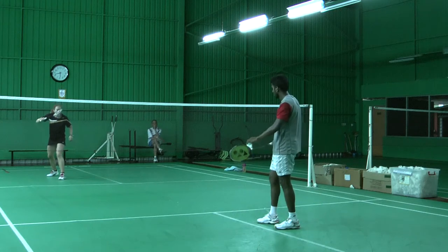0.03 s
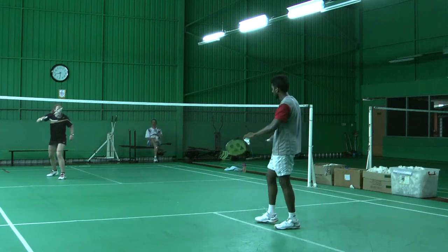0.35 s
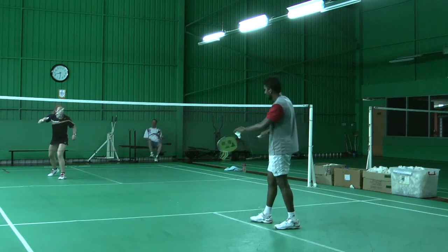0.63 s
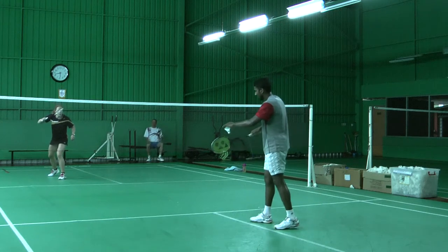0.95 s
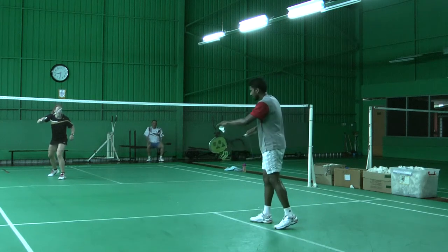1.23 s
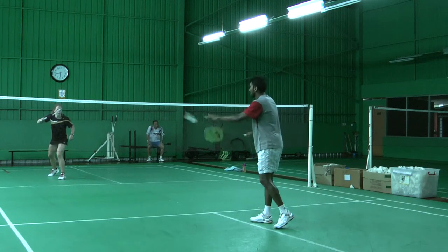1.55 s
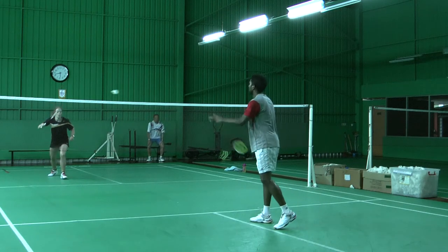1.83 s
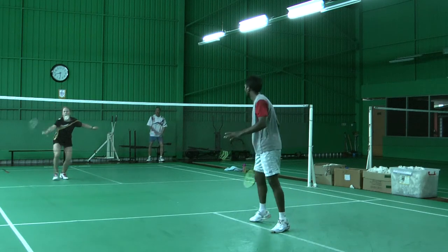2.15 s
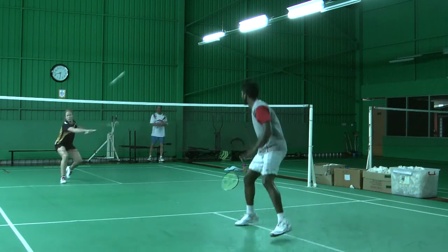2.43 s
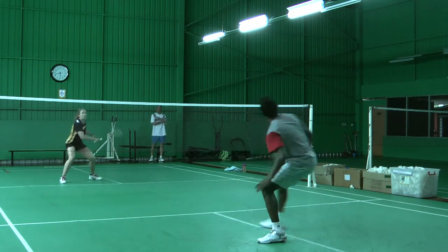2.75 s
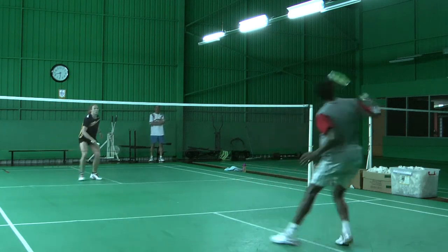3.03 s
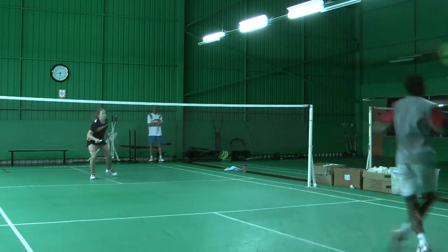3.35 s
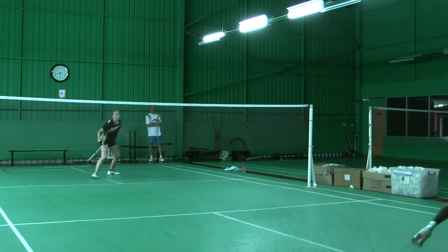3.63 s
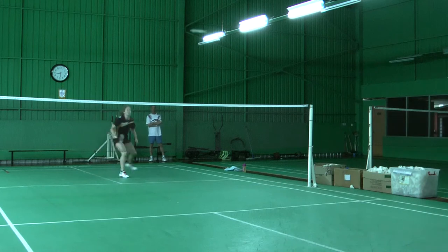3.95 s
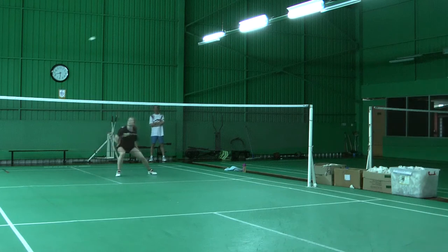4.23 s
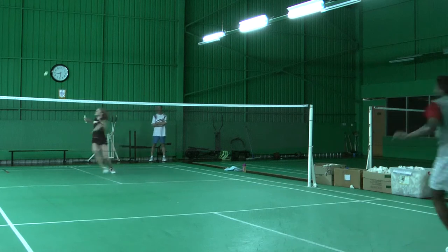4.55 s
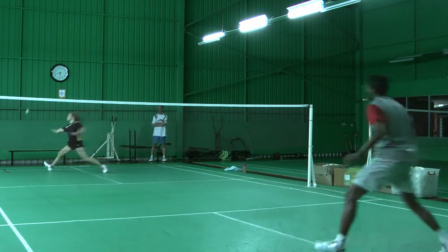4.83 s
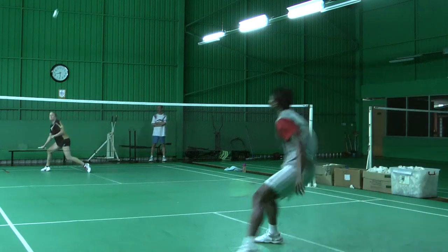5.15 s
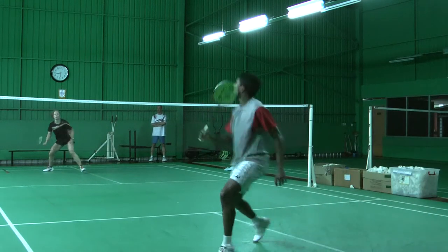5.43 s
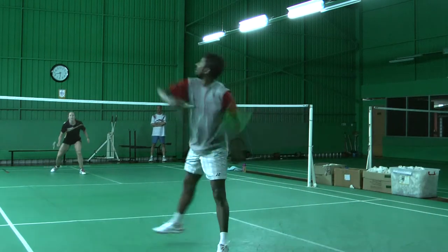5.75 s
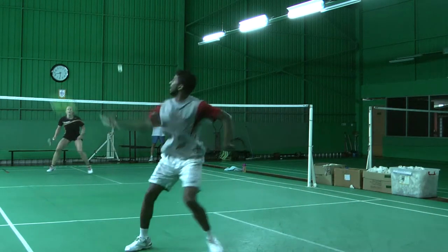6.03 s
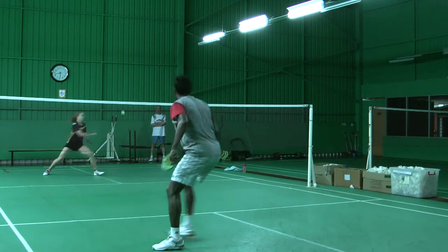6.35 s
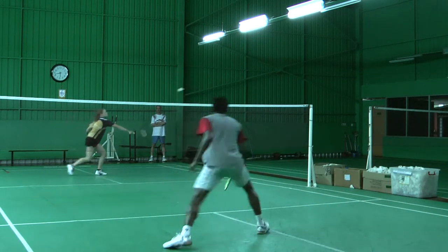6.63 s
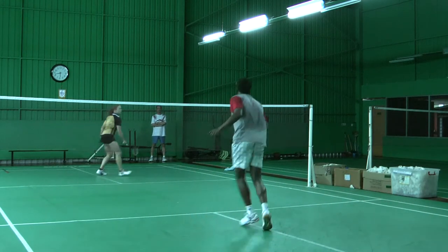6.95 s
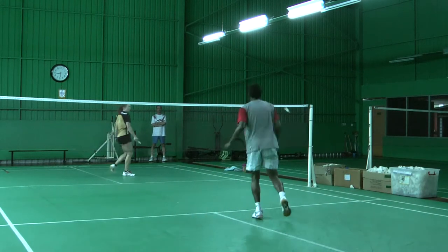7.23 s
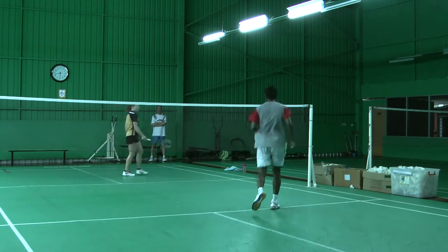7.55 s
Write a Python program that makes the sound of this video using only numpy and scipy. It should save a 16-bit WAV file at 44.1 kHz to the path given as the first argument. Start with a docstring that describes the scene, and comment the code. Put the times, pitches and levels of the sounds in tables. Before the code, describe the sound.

Over quiet ventilation and faint hums, a badminton game starts with soft taps, then builds into sharp racket cracks, short swishes, high shoe squeaks and slapping footfalls. Each sound leaves a long echo in the big indoor hall. Near the end come a weak hit, light steps and a rustle of clothing. Heard from beside the court, the sound is compressed so echoes stay strong, and it drops to silence five times for an instant.

```python
"""Badminton rackets strike a shuttle: each impact cracks and excites the membrane modes of the strings.
Swings whistle by vortex shedding; rubber soles squeak by stick-slip friction and thud on the court.
A large sheet-metal sports hall reverberates after each, over rustling clothes, low hums and air noise.
An automatic gain control holds the loud echoes level, and the sound cuts out five times."""
import sys
import numpy as np
from scipy import signal
from scipy.fft import rfft, irfft, next_fast_len
from scipy.io import wavfile
from scipy.ndimage import uniform_filter1d, minimum_filter1d

SR = 44100
rng = np.random.default_rng(int(sys.argv[2]) if len(sys.argv) > 2 else 0)


def inscribe(sig):
    """Save sig as 16-bit PCM at rate SR to the path in sys.argv[1].

    A 1-D sig is mono; a 2-D sig holds one channel per row.
    Samples are clipped to [-1, 1] before scaling.
    """
    pcm = np.round(np.clip(np.atleast_2d(sig).T, -1, 1) * 32767)
    wavfile.write(sys.argv[1], SR, pcm.astype(np.int16))


N = 343537
TIME = np.arange(N) / SR
CUTOFF_HZ = 16000

# Spectral envelope of the crack: f/Hz, level/dB
CRACK_SPECTRUM = [(100, -12), (250, -4), (480, 4), (800, -1), (1300, 4.5), (2100, 3.5), (3200, 3),
                  (4400, 2), (6500, 4.5), (8000, 1), (11000, 4), (16000, 0.5)]
# Racket impacts: t/s, level/dB, low-pass f/Hz, string f/Hz, ping re crack/dB, cork push/1, direct gain/dB
RACKET_HITS = [(0.5148, -10, 7200, 1203, -10.5, 1.1, -12.5), (1.509, -28.5, 4640, 1076, -1.5, .7, -6),
               (2.0926, 23.5, 5840, 1270, -17, 0.82, -2), (3.481, -7.5, 7000, 1390, -10, .7, -4.5),
               (3.7164, 18, 6300, 1181, -19, 0.36, -4.5), (4.971, 24.5, 6000, 1093, -12, 0.65, -18),
               (5.8738, 15.5, 6800, 1214, -18.5, 1.4, -8.5), (6.497, -22, 2500, 1357, 4.5, .7, -2)]


def strokes(crack_s=0.0042, contact_s=0.00037, string_t60=0.086, size=16384):
    """Impact excitation: the cork pushes, the feathers crack, and the string bed rings in damped modes."""
    bus, t = np.zeros((2, N)), TIME[:size]
    modes = [(1, 0), (1.58, -20), (2.15, -18), (2.7, -18.5)]  # frequency ratio, level/dB
    u = t / contact_s - 2
    for s, level_db, bright_hz, string_hz, ring_db, push, direct_db in RACKET_HITS:
        contact = push * 2 * u * np.exp(-u * u)  # derivative of a Gaussian pulse
        crack = rng.standard_normal(size) * np.exp(-t / crack_s)
        ping = sum(from_db(db) * np.sin(2 * np.pi * ratio * string_hz * t) for ratio, db in modes)
        ping *= from_db(ring_db - 60 * t / string_t60)
        hit = impact(crack + contact, CRACK_SPECTRUM, bright_hz, crack_s)
        direct, radiated = from_db(level_db) * (hit + ping)
        add(bus, s, from_db(direct_db) * direct, radiated)
    return bus


def impact(force, spectrum, bright_hz, length_s):
    """Source-filter model: an impact heard directly, and averaged over directions to a smooth spectrum."""
    impulse = np.eye(1, len(force))[0]
    pair = lowpass(colour(np.array([force, impulse]), spectrum), bright_hz)
    return pair * np.sqrt(length_s * SR / 2 / np.sum(pair ** 2, axis=1, keepdims=True))


# Racket swings: fastest moment t/s, half duration/s, f/Hz, level/dB
SWINGS = [(2.076, 0.0066, 485, -23), (3.655, 0.0027, 514, -8.5), (3.702, 0.0089, 669, -12.5),
          (4.227, 0.0039, 557.5, -15.5), (4.898, 0.0078, 567, -29), (4.929, 0.012, 491, -32),
          (7.483, 0.0065, 508.5, -33.5)]


def swishes(unsteady=0.086, hall_db=-3, size=4096):
    """Vortex shedding: the shaft gives a short, low Aeolian tone at the peak of the swing."""
    bus, t = np.zeros((2, N)), TIME[:size] - size / 2 / SR
    for s, half_length, hz, level_db in SWINGS:
        phase = 2 * np.pi * np.cumsum(hz * (1 + unsteady * wander(92, size))) / SR
        whistle = from_db(level_db) * np.sqrt(2) * np.sin(phase) * np.exp(-(t / half_length) ** 2)
        add(bus, s + t[0], whistle, from_db(hall_db) * whistle)
    return bus


# Sliding soles: t/s, duration/s, f/Hz, level/dB, overtone gain/dB, direct gain/dB
SLIDES = [(1.408, 0.043, 2894, -46, -28, -10), (2.671, 0.0087, 2290, -8.5, 5.5, 4),
          (2.711, 0.014, 2327, -7.5, -2, -2.5), (2.803, .007, 2816, -6.5, -14, -4),
          (3.051, 0.0061, 2870, -2.5, -9, -9.5), (3.063, 0.017, 2447, -5, -17, 2),
          (3.108, 0.022, 2238, -9.5, 2.5, -3.5), (3.631, 0.031, 2095, -9.5, 0, -9.5),
          (3.653, 0.055, 2070, -10, 2.5, -6.5), (4.226, 0.012, 2790, -7.5, -7, -1.5),
          (4.247, 0.063, 2925, -11, -4, -1), (5.13, .03, 2216, 8.5, 0, 0.5),
          (5.185, 0.0088, 2160, 12.5, 3, -4.5), (5.209, 0.015, 2483, -5, -12.5, 18),
          (5.252, 0.026, 2423, 11.5, -4, -5), (5.799, 0.028, 2788, -1.5, -10.5, -0.5),
          (5.833, 0.045, 2720, -3, -2, -4), (5.892, 0.0227, 2313, 2.5, -2.5, -4.5),
          (5.931, 0.071, 2850, -5, -7, -12), (5.956, 0.037, 2487, -0.5, -12, -23),
          (6.426, 0.022, 2320, -12, -7.5, -1.5), (6.485, 0.037, 2190, -19, -11.5, 10.5)]


def squeaks(sag=.04, jitter=.12, flutter=.24, scuff_hz=2100, rub_db=-9, edge_s=0.00064, size=8192):
    """Stick-slip oscillation: rubber grips and lets go thousands of times a second, giving harmonics."""
    bus, t = np.zeros((2, N)), TIME[:size]
    for s, length, hz, level_db, overtone_db, direct_db in SLIDES:
        # long, low scuffs are rougher than tight, high ones: they waver and hiss more
        roughness = .135 + 11 * length * (scuff_hz / hz) ** 4.6
        glide = 1 + sag * (.5 - np.minimum(t / length, 1))  # the pitch falls as the foot slows
        pitch = hz * glide * (1 + jitter * roughness * wander(450, size))
        phase = 2 * np.pi * np.cumsum(pitch) / SR
        overtones = from_db(overtone_db + np.array([0, -5, -9]))
        tone = np.sin(phase) + sum(gain * np.sin(k * phase) for k, gain in enumerate(overtones, 2))
        tone = unit_rms(lowpass(tone, hz=8300, order=4))
        rub = unit_rms(lowpass(rng.standard_normal(size), hz=7700))
        gate = np.clip(np.minimum(t, length - t) / edge_s, 0, 1)
        grip = np.exp(flutter * wander(130, size))
        sound = gate * grip * (tone + roughness * from_db(rub_db) * rub)
        sound *= from_db(level_db) * np.sqrt(length * SR / np.sum(sound ** 2))
        add(bus, s, from_db(direct_db) * sound, all_round(sound, width_hz=110))
    return bus


def all_round(sound, width_hz):
    """Spatial averaging: summed over all directions, the fine ripples of a spectrum even out."""
    spectrum = rfft(sound)
    bins = max(int(width_hz * len(sound) / SR), 1)
    power = np.abs(uniform_filter1d(np.abs(spectrum) ** 2, bins))
    return irfft(np.sqrt(power) * np.exp(1j * np.angle(spectrum)))


# Spectral envelope of a sole's slap, ahead of its low-pass: f/Hz, level/dB
SOLE_SPECTRUM = [(40, -28), (100, -6.5), (200, -1), (420, 3.5), (700, 1.5), (1100, 4.5), (2000, 13),
                 (4000, 12), (16000, 23)]
# Footfalls: t/s, level/dB, low-pass f/Hz, direct gain/dB
FOOTFALLS = [(2.396, 0, 620, 0), (2.554, -18, 1200, 3), (2.839, -2, 700, -1.5), (3.076, -2, 520, -4),
             (3.246, -19, 915, 6), (3.634, -2.5, 1400, -14), (3.795, 9, 1200, -5), (4.705, -33.5, 900, 6),
             (4.945, 15, 1100, -1), (4.98, 7.5, 350, -10.5), (5.056, 2.5, 1220, -3),
             (5.948, 4.5, 1307, -7.5), (6.489, -15, 1270, 0), (6.61, -22, 917, 4.5), (6.693, -35, 1144, 16),
             (7.093, -34, 1200, -2), (7.459, -31.5, 920, -10), (7.7233, -24.5, 1210, -3.5)]


def steps(slap_s=0.011, forefoot_s=.031, forefoot_db=-6, forefoot_dulling=0.79, size=4096):
    """Impact noise: the heel, then the softer, duller forefoot, slaps the mat in a cluster of contacts."""
    bus, t = np.zeros((2, N)), TIME[:size]
    for s, level_db, bright_hz, direct_db in FOOTFALLS:
        for delay, part_db, dulling in [(0, 0, 1), (forefoot_s, forefoot_db, forefoot_dulling)]:
            contacts = rng.standard_normal(size) * np.exp(-t / slap_s)
            slap = impact(contacts, SOLE_SPECTRUM, dulling * bright_hz, slap_s)
            direct, radiated = from_db(level_db + part_db) * slap
            add(bus, s + delay, from_db(direct_db) * direct, radiated)
    return bus


# Reverberation time: f/Hz, T60/s
REVERB_TIMES = [(100, 1.74), (250, 1.62), (500, 1.52), (1200, 1.39), (2500, 1.665), (4500, 1.966),
                (7000, 1.504), (10000, 1.39), (16000, .7)]
# Growth of the diffuse field as far walls answer: t/s after the source, level/dB
DIFFUSE_ONSET = [(0, -12), (.015, -9), (.028, -7), (.045, -1), (.11, 1), (.2, 0)]
# Reflections scattered by ribbed walls and roof: delay t/s, level/dB
REFLECTIONS = [(.002, -12), (0.0155, -14), (0.027, -21), (.046, -23), (0.079, -30.5)]


def hall(x, side_db=-13, scatter_s=0.01, echo_hz=7000, bands=18):
    """Reverberation: scattered early reflections, then a diffuse field that decays band by band."""
    t = TIME[:3 * SR]
    noise = rfft(stereo_noise(len(t), side_db))
    hz = np.arange(len(t) // 2 + 1) * SR / len(t)
    centres = np.geomspace(60, CUTOFF_HZ, bands)
    tail = 0
    for centre, share in zip(centres, np.eye(bands)):
        band = irfft(noise * np.interp(hz, centres, share))
        tail = tail + band * from_db(-60 * t / at_hz(REVERB_TIMES, centre))
    tail *= from_db(np.interp(t, *np.transpose(DIFFUSE_ONSET))) / np.sqrt(SR / 10)
    bursts = sum(from_db(db) * (t >= s) * np.exp(-np.abs(t - s) / scatter_s) for s, db in REFLECTIONS)
    scattered = bursts * stereo_noise(len(t), side_db)
    echoes = lowpass(scattered + 1e-18, echo_hz) / np.sqrt(scatter_s * SR / 2)
    return signal.fftconvolve(x[None], tail + echoes, axes=1)[:, :N]


# Spectrum of rubbing cloth: f/Hz, level/dB
CLOTH_SPECTRUM = [(100, -30), (3000, 6), (9000, -6), (16000, -19)]
# Movements of the near player: t/s, duration/s, level/dB
MOVEMENTS = [(1.303, 0.22, -47.5), (1.676, 0.3, -51), (6.682, 0.3, -33.5), (7.209, 0.14, -51)]


def rustles():
    """Friction noise: shirt and shorts brush softly, swelling and fading with each movement."""
    envelope = sum(from_db(db) * np.sin(np.pi * np.clip((TIME - s) / length, 0, 1))
                   for s, length, db in MOVEMENTS)
    return envelope * unit_rms(colour(stereo_noise(N, side_db=-17), CLOTH_SPECTRUM))


# Low hums: peak t/s, half duration/s, f/Hz, level/dB
HUM_TONES = [(.75, 0.46, 187.4, -44), (5.3, 0.88, 122.4, -49.5), (6.95, 0.53, 125.3, -44)]


def hums(waver_hz=2.2):
    """Slow modulation: low tones waver slightly in pitch as they swell and fade."""
    sound = 0
    for s, half_length, hz, level_db in HUM_TONES:
        phase = 2 * np.pi * np.cumsum(hz + waver_hz * wander(14, N)) / SR
        swell = from_db(level_db) * np.exp(-((TIME - s) / half_length) ** 2)
        sound = sound + swell * np.sqrt(2) * np.sin(phase)
    return sound


# Spectrum of the ventilation: f/Hz, level/dB
AIR_SPECTRUM = [(25, -38.5), (55, -15), (95, -4), (180, -4.5), (260, -9.5), (420, -9.5), (550, -11),
                (700, -19), (1200, -18.5), (2500, -25.5), (6000, -33), (9000, -41.5), (16000, -51)]


def ventilation(air_db=-45):
    """Stationary flow noise: moving air gives a steady, low rush."""
    return from_db(air_db) * unit_rms(colour(stereo_noise(N, side_db=-17.5), AIR_SPECTRUM))


def from_db(db):
    """Amplitude ratio of a level in decibels."""
    return 10 ** (np.asarray(db) / 20)


def unit_rms(x):
    """Normalisation to unit power."""
    return x / np.sqrt(np.mean(x ** 2) + 1e-20)


def at_hz(points, hz):
    """Interpolation of a table on a log-frequency axis."""
    frequencies, values = np.transpose(points)
    return np.interp(np.log(hz + 1), np.log(frequencies), values)


def lowpass(x, hz, order=2):
    """Butterworth low-pass filter."""
    return signal.sosfilt(signal.butter(order, min(hz, .45 * SR), fs=SR, output="sos"), x)


def colour(x, spectrum):
    """Minimum-phase filter: folding the cepstrum imposes a spectrum causally."""
    size = 2 * next_fast_len(x.shape[-1])
    hz = np.arange(size // 2 + 1) * SR / size
    cepstrum = irfft(np.log(from_db(at_hz(spectrum, hz))))
    cepstrum[1:size // 2] *= 2
    cepstrum[size // 2 + 1:] = 0
    return irfft(rfft(x, size) * np.exp(rfft(cepstrum)))[..., :x.shape[-1]]


def wander(hz, size):
    """Low-pass noise: smooth random motion of unit power."""
    return unit_rms(lowpass(rng.standard_normal(2 * size), hz)[size:])


def stereo_noise(size, side_db):
    """Partial coherence: diffuse noise at two closely spaced points."""
    mid, side = rng.standard_normal((2, size))
    return mid + from_db(side_db) * side * np.array([[1], [-1]])


def add(bus, s, direct, radiated):
    """Superposition at time s: row 0 goes straight to the listener, row 1 into the hall."""
    start = round(s * SR)
    bus[:, start:start + len(direct)] += np.array([direct, radiated])[:, :N - start]


def scene():
    """Superposition of the players' direct sound, the reverberant field and the background."""
    direct, into_hall = strokes() + steps() + squeaks() + swishes()
    return direct + hall(into_hall) + rustles() + ventilation()


def gain_control(x, target_db=-22.5, attack_s=0.0026, release_db_per_s=27, firmness=0.93, hop=32):
    """Compression: the gain falls by a share (firmness) of the excess level, then climbs back."""
    power = uniform_filter1d(x[0] ** 2, 4 * hop)[::hop]
    level_db = 10 * np.log10(np.abs(power) + 1e-12)
    pull = 1 - np.exp(-hop / SR / attack_s)
    cut, cuts = 0., []
    for wanted_cut in firmness * (level_db - target_db):
        cut = max(cut + pull * max(wanted_cut - cut, 0) - release_db_per_s * hop / SR, 0)
        cuts.append(cut)
    return x * from_db(-np.interp(TIME, TIME[::hop], cuts))


def limiter(x, ceiling_db=-7.5, release_db_per_s=3000, window=24):
    """Peak limiting: catches the first peak of a crack, too quick for the gain control."""
    excess_db = np.maximum(20 * np.log10(np.abs(x).max(axis=0) + 1e-9) - ceiling_db, 0)
    cut_db = np.maximum.accumulate(excess_db + release_db_per_s * TIME) - release_db_per_s * TIME
    return x * from_db(uniform_filter1d(minimum_filter1d(-cut_db, window), window))


# Gaps where the sound cuts out: start t/s, end t/s
GAPS = [(.349, .467), (1.942, 2.059), (4.461, 4.580), (5.988, 6.106), (7.550, 7.668)]


def record(dry):
    """Signal chain: compression and limiting, then the hums join and all is gated and band-limited."""
    gate = np.ones(N)
    for start, end in GAPS:
        gate[round(start * SR):round(end * SR)] = 0
    sound = (limiter(gain_control(dry)) + hums()) * uniform_filter1d(gate, size=64)
    return signal.sosfilt(signal.ellip(12, .1, 80, CUTOFF_HZ, fs=SR, output="sos"), sound)


dry = scene()
out = record(dry)
inscribe(out)
```